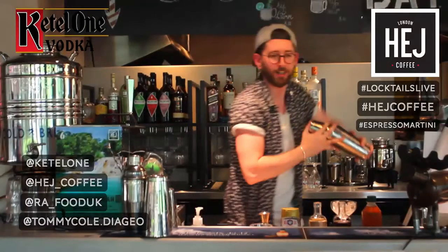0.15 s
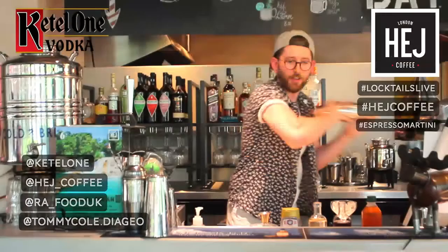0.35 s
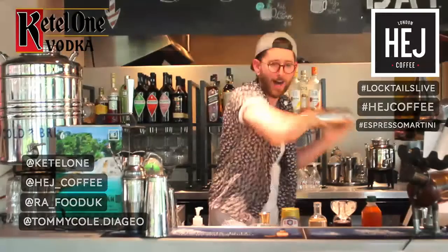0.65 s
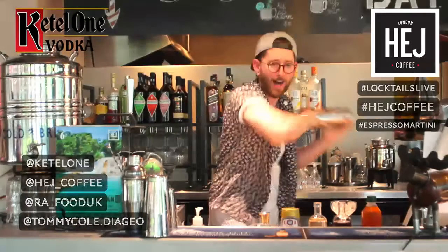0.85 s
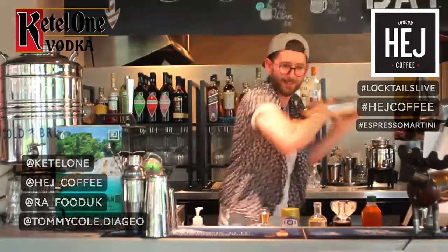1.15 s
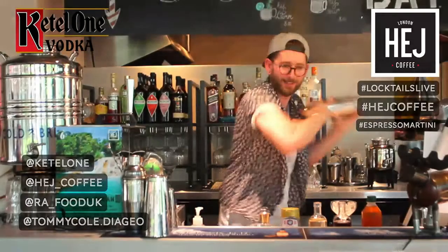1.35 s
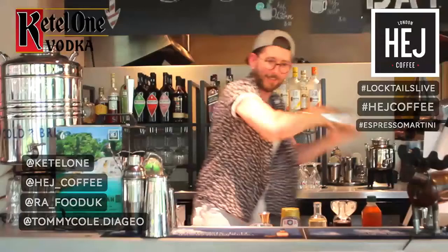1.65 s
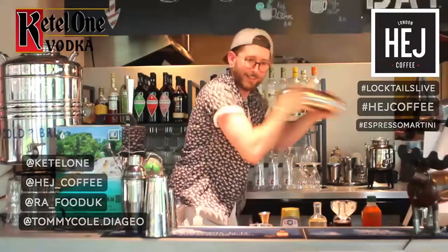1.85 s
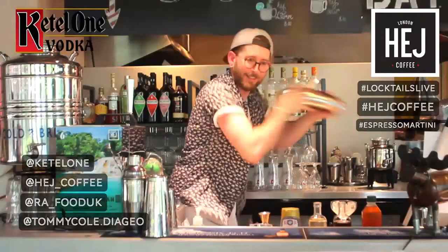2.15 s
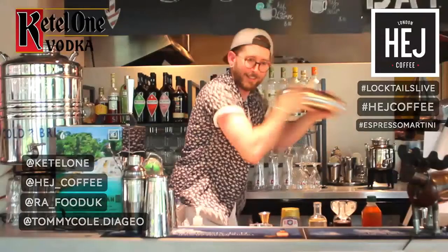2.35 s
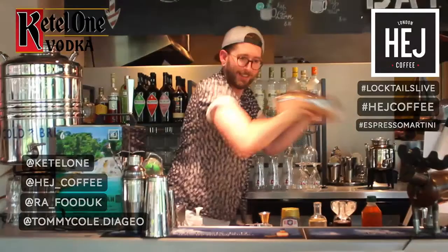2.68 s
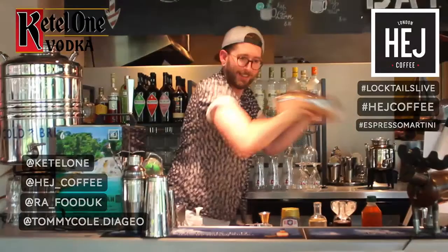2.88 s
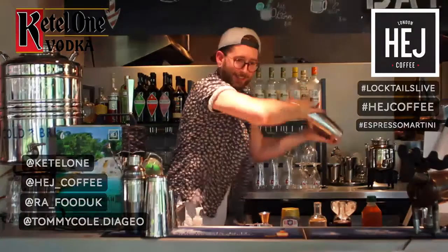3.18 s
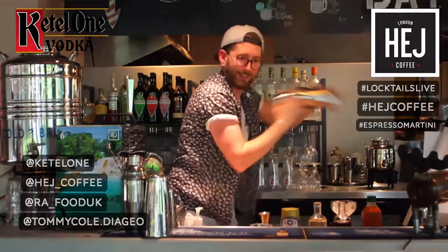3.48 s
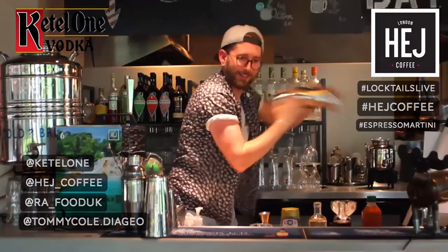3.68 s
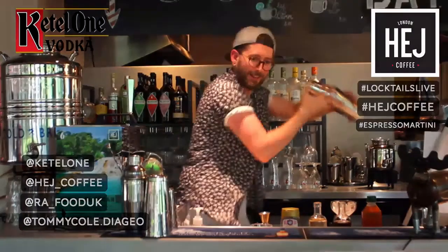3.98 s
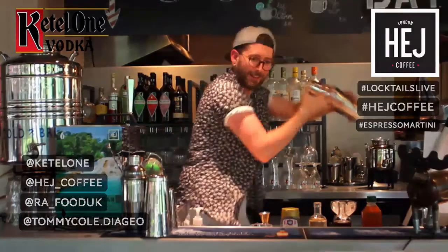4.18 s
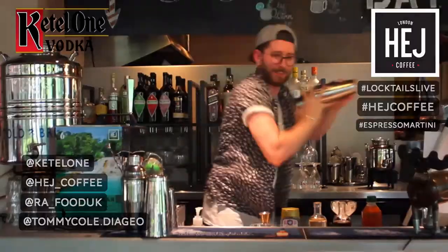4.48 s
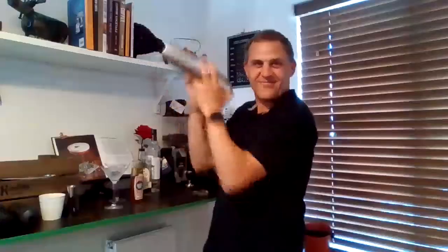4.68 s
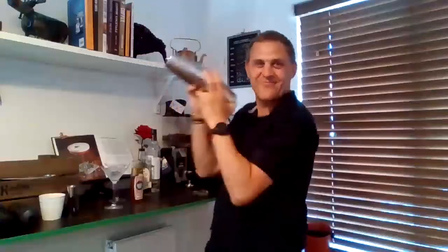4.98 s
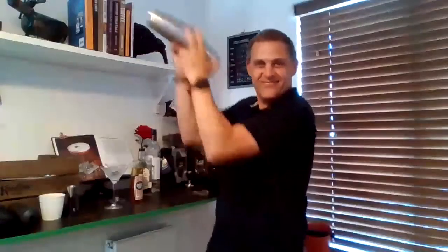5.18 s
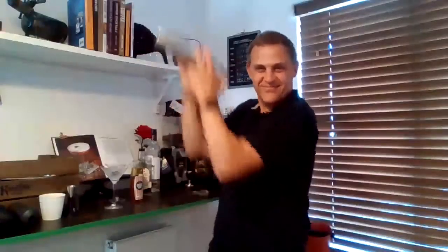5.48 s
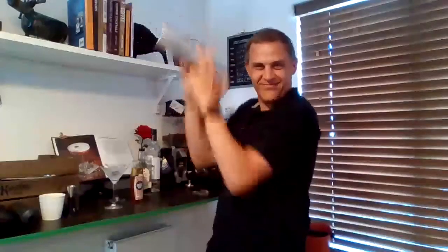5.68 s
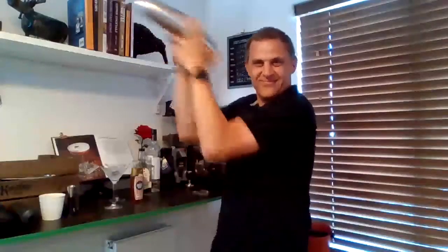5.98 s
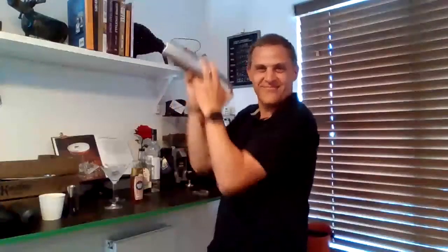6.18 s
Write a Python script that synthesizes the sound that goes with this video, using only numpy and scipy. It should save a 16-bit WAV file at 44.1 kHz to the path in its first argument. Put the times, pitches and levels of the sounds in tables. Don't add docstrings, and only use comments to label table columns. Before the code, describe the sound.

Brisk, continuous back-and-forth shaking of ice in a metal tin, sharp cracks and short rings in a small room, with brief digital dropouts.

```python
import sys
import numpy as np
from scipy import signal
from scipy.fft import rfft
from scipy.io import wavfile
from scipy.ndimage import uniform_filter1d

SR = 44100
rng = np.random.default_rng(int(sys.argv[2]) if len(sys.argv) > 2 else 0)


def voltage_ratio(decibels):
    exponent = np.asarray(decibels, float) / 20
    return 10 ** exponent


def log_audio(samples):
    frames = np.atleast_2d(samples).T
    limited = np.clip(frames, -1, 1)
    pcm = np.round(limited * 32767).astype(np.int16)
    wavfile.write(sys.argv[1], SR, pcm)


N = 279594
HOLD_S = 0.017
HELD_SPACING_HZ = 130


def rms_one(x):
    return x / np.sqrt(np.mean(x ** 2) + 1e-20)


def filtered(x, order, edges_hz, kind):
    return signal.sosfilt(signal.butter(order, edges_hz, kind, fs=SR, output="sos"), x)


def drift(rate_hz):
    r = np.exp(-128 * np.pi * rate_hz / SR)
    noise = rng.standard_normal(N // 64 + 1002)
    slow = signal.lfilter([1], [1, -2 * r, r * r], noise)[1000:]
    return np.interp(np.arange(N) / 64, np.arange(len(slow)), rms_one(slow))


def ring(clicks, hz, t60_s):
    r = voltage_ratio(-60 / (t60_s * SR))
    w = 2 * np.pi * hz / SR
    return signal.lfilter([0, np.sin(w)], [1, -2 * r * np.cos(w), r * r], clicks + 1e-18)


def impacts(per_s, spread_db):
    size = voltage_ratio(spread_db * np.minimum(rng.exponential(1, N), 3.5)) * rng.choice([-1, 1], N)
    return size * (rng.random(N) < per_s / SR)


def fridge():
    rumble = filtered(rng.standard_normal(N), 2, [60, 220], "band")
    hum = ring(rng.standard_normal(N), hz=76.4, t60_s=0.5)
    return voltage_ratio(-69.5) * rms_one(rumble) + voltage_ratio(-79.5) * rms_one(hum)


def room(x):
    t60_s, first_echo_s, patterns = 0.27, 0.004, 5
    out, t = 0, np.arange(SR // 2) / SR
    for _ in range(patterns):
        tail = rng.standard_normal(len(t)) * voltage_ratio(-60 * t / t60_s) * (t > first_echo_s)
        tail = signal.lfilter([0.6], [1, -0.4], tail)
        tail = tail / np.sqrt(patterns * np.sum(tail ** 2))
        out = out + signal.fftconvolve(x * drift(5.0), tail)[:N]
    return out


def effort():
    # start_s (peak), force_db, length_s, weight_db
    throws = [(0.061, -18.5, 0.18, 4.5), (0.315, -26, .15, 4.5), (0.557, -26.5, .115, -8.5),
              (0.77, -16.5, 0.098, 5), (1.04, -21, 0.11, 3.5), (1.217, -15.5, 0.13, 2.5),
              (1.454, -17, 0.1, -0.5), (1.694, -27, 0.17, -2.5), (1.905, -23.5, 0.14, 3.5),
              (2.163, -30, 0.1, -8), (2.36, -26.5, .19, 5.5), (2.583, -25, .24, 3.5),
              (2.831, -25.5, 0.11, 7), (3.065, -26.5, 0.15, 1), (3.274, -21, 0.17, 3),
              (3.511, -20, 0.11, -2.5), (3.73, -23.5, 0.18, -5.5), (3.979, -20, 0.15, 3),
              (4.227, -21.5, .18, -5), (4.446, -23.5, .26, 0.5), (4.698, -20, 0.2, 0),
              (4.945, -21.5, 0.13, 1.5), (5.185, -21.5, .145, -3), (5.409, -21.5, 0.12, -7),
              (5.66, -20.5, .11, 0), (5.89, -18, 0.17, -1.5), (6.12, -22.5, 0.17, 3)]
    # start_s (peak), force_db, length_s, weight_db
    pulls = [(0.188, -25, 0.17, 1.5), (0.43, -22, 0.22, 2), (0.655, -18.5, 0.1, -0.5),
             (0.865, -16, 0.19, -4.5), (1.114, -17, 0.091, -3), (1.359, -17.5, 0.09, -8.5),
             (1.572, -17, 0.11, -2.5), (1.799, -26.5, 0.055, -5.5), (2.029, -25, 0.2, -1),
             (2.285, -26, 0.31, 3), (2.468, -23.5, 0.15, 0.5), (2.715, -27.5, .28, 1.5),
             (2.938, -23, 0.22, 1), (3.168, -23, 0.063, 8), (3.415, -24, .11, -2), (3.619, -18, 0.11, 5),
             (3.86, -22, 0.14, 3), (4.095, -20.5, .195, 1.5), (4.34, -18.5, 0.085, 4.5),
             (4.569, -22.5, 0.17, 0.5), (4.83, -17.5, 0.11, -4), (5.049, -24.5, 0.13, -2.5),
             (5.291, -20, 0.099, -2), (5.526, -19.5, .11, 2), (5.758, -20.5, 0.062, -3),
             (5.99, -21, 0.14, -1), (6.227, -18.5, 0.24, -1.5)]
    # start_s (peak), force_db, length_s, weight_db
    rebounds = [
        (2.659, -26.5, .2, -6),
        (3.019, -34.5, 0.25, -8),
        (4.04, -24, 0.09, 4),
        (4.763, -35, 0.091, 6),
        (5.123, -22, 0.037, 3.5),
    ]
    t, power = np.arange(0, N + 64, 64) / SR, 1e-12
    for turns, rise_share in ((throws, 0.49), (pulls, 0.45), (rebounds, 0.31)):
        for s, force_db, length_s, weight_db in turns:
            away = np.where(t < s, (s - t) / rise_share, (t - s) / (1 - rise_share))
            shape_db = force_db - 10 * away / max(length_s, 0.03)
            crackle_db = -1.5 + 0.03 * weight_db + 0.0054 * (force_db + 28)
            power = power + voltage_ratio(shape_db + np.array([[weight_db], [0], [crackle_db]])) ** 2
    power = uniform_filter1d(power, size=5, axis=1)
    return np.array([np.interp(np.arange(N) / SR, t, 10 * np.log10(p)) for p in power])


def drive(rows_db, hz):
    place = np.interp(np.log(hz), np.log([700, 1200, 4200, 5600]), [0, 1, 1, 2])
    lower = min(int(place), 1)
    return voltage_ratio(rows_db[lower] + (place - lower) * (rows_db[lower + 1] - rows_db[lower]))


def clear_rings():
    # start_s, pitch_hz, level_db
    lone_tones = [(0.269, 4480, -36.5), (0.307, 1400, -32), (0.629, 1453, -34), (0.751, 227, -45.5),
                  (1.083, 2770, -37), (1.587, 897, -34.5), (1.894, 240, -48), (1.916, 2520, -33),
                  (2.15, 4330, -37), (2.276, 940, -38.5), (2.282, 240, -44), (2.81, 390, -46.5),
                  (2.82, 2740, -29), (3.147, 385, -46.5), (3.491, 2680, -31), (3.5, 390, -48),
                  (5.16, 3200, -31), (3.852, 2630, -43), (4.554, 4550, -33), (4.75, 1360, -30),
                  (4.805, 3220, -31), (4.963, 440, -48), (5.406, 4540, -34), (5.33, 2954, -30),
                  (5.647, 835, -40.5), (5.743, 2740, -24.5), (5.746, 6930, -30), (6.036, 1490, -33),
                  (6.107, 373, -43.5), (6.276, 4520, -36)]
    swell_s, t60_s, trim_db = 0.031, 0.097, 3.5
    out, t = np.zeros(N + SR), np.arange(SR // 4) / SR
    shape = (1 - np.exp(-t / swell_s)) * voltage_ratio(-60 * t / t60_s)
    shape = shape / shape.max()
    for s, hz, level_db in lone_tones:
        at = round(s * SR)
        out[at:at + len(t)] += voltage_ratio(level_db + trim_db) * shape * np.sin(2 * np.pi * hz * t)
    return out[:N]


def cracks(rows_db):
    snap = filtered(impacts(per_s=450.0, spread_db=3.5), 1, [1100, 5200], "band")
    return voltage_ratio(-9 + rows_db[1]) * rms_one(snap)


def ice(rows_db):
    # pitch_hz, density_db (dB per Hz)
    color = [(150, -40.5), (260, -41.5), (450, -23), (640, -21), (920, -9), (1450, -5), (2200, -5),
             (2800, 0), (4000, -6.5), (5700, -9.5), (7000, -7.5), (8500, -7.5)]
    color_hz, color_db = np.transpose(color)
    chips_db, slush_db, wander_db = -4.5, -6.5, 2.53
    chips, out = rms_one(impacts(per_s=5200.0, spread_db=3.5)), 0
    dealt = rng.integers(0, 3, N)
    slush = rng.standard_normal((2, N))
    for k, hz in enumerate(np.geomspace(150, 8500, num=25)):
        force = voltage_ratio(chips_db) * chips * (dealt == k % 3) * np.sqrt(3) + voltage_ratio(slush_db) * slush[k % 2]
        band = filtered(force, 2, [hz / 1.09, hz * 1.09], "band")
        level_db = np.interp(np.log(hz), np.log(color_hz), color_db) + 11
        out = out + voltage_ratio(level_db + wander_db * drift(10.3)) * drive(rows_db, hz) * band
    return out


def tin(rows_db):
    # pitch_hz, level_db, t60_s
    wall_modes = [(240, -32.5, 0.074), (390, -18, 0.064), (455, -15.5, 0.071), (616, -21.5, .06),
                  (940, -8, 0.03), (1040, -29, 0.013), (1400, -3.5, 0.13), (1437, -7, 0.13),
                  (1544, -2, 0.068), (1803, -2, 0.048), (2120, -8, 0.069), (2275, -12, 0.13),
                  (2275, -12.5, 0.066), (2556, 0, 0.079), (2700, 1.5, 0.18), (2794, 3, 0.059),
                  (2900, -6, 0.029), (2934, -2, 0.16), (3229, -3.5, 0.029), (3200, -7.5, 0.034),
                  (3096, -5.5, 0.12), (3346, -6.5, 0.02), (3807, -9, 0.069), (4324, -1, 0.14),
                  (4540, -2, 0.04), (4815, 0.5, 0.0086), (6300, -3.5, .05), (6860, -23.5, .06)]
    # start_s, body_db, cap_db
    grip = [(0.0, -3, -18.5), (0.35, 6, 6.5), (0.8, 0, -10.5), (1.14, -1, -0.5), (1.35, 1, 0.5),
            (1.7, 5, 4), (2.4, 0, 0), (2.9, 6, -0.5), (3.1, 8.5, 9), (3.4, 2, -10), (3.7, 1.5, 1),
            (4.2, -3, 0.5), (4.5, 3, 1.5), (5.08, 3.5, -3), (5.17, 5, 3.5), (5.42, 4, 1.5), (5.6, 3, 3),
            (6.33, 3, 3.5)]
    s, body_db, cap_db = np.transpose(grip)
    t = np.arange(N) / SR
    body, cap = voltage_ratio(np.interp(t, s, body_db)), voltage_ratio(np.interp(t, s, cap_db))
    knocks, out = impacts(per_s=260.0, spread_db=5.0), 0
    for hz, level_db, t60_s in wall_modes:
        spot = voltage_ratio(5.0 * rng.standard_normal(N)) * rng.choice([-1, 1], N)
        free = body if hz < 1900 else cap if hz < 3600 else 1
        mode = rms_one(ring(knocks * spot, hz, t60_s)) / 4
        out = out + voltage_ratio(level_db) * free * drive(rows_db, hz) * mode
    return out


def scene():
    rows_db = effort()
    shaker = voltage_ratio(-6) * tin(rows_db) + ice(rows_db) + cracks(rows_db) + clear_rings()
    shaker = filtered(shaker, 2, 306, "high")
    return (shaker + voltage_ratio(-17.5) * room(shaker) + fridge())[None]


def strongest(x, count):
    window = np.hanning(len(x))
    height = 2 * abs(rfft(x * window, SR // 10)) / window.sum()
    peaks = signal.find_peaks(height, distance=HELD_SPACING_HZ / 10)[0]
    favored = height[peaks] * peaks ** 0.6
    peaks = peaks[np.argsort(favored)[-count:]]
    return np.array([10.0 * peaks, height[peaks]])


def held_tones(x, at, mid, length_s, top_hz, top_db):
    # start_s (middle of the packet), pitch_hz, level_db
    held_modes = [(.126, 1366, -28), (2.532, 1180, -45), (.174, 2700, -28.5), (.427, 2740, -23),
                  (.477, 1460, -30.5), (.477, 1850, -32), (1.222, 964, -26.5), (1.222, 1455, -24),
                  (1.565, 950, -31.5), (1.565, 1600, -23), (1.565, 1740, -21), (1.565, 2340, -25),
                  (1.565, 2660, -21), (1.894, 920, -31), (1.894, 1500, -30.5), (1.894, 2100, -28.5),
                  (2.532, 1554, -37), (2.532, 2120, -35), (2.705, 1590, -27), (3.474, 1630, -40),
                  (3.474, 2130, -38), (4.216, 2790, -27), (4.285, 1840, -32), (4.285, 2550, -28),
                  (5.224, 1437, -33.5), (5.224, 1500, -32), (5.371, 2740, -30), (5.700, 1490, -32),
                  (5.796, 1400, -34), (5.796, 2900, -28),
                  (.427, 6300, -36), (.427, 6680, -31), (1.222, 3690, -22), (1.222, 3910, -27),
                (.174, 6860, -31.5), (1.334, 4070, -32), (1.565, 3156, -23), (1.894, 3140, -36),
                (4.216, 5170, -29), (2.532, 3200, -31.5), (2.532, 3780, -37), (2.532, 4490, -37),
                (2.532, 6360, -37), (4.497, 4580, -38), (3.474, 4300, -40), (3.474, 6100, -46),
                (4.216, 3140, -25), (4.216, 4070, -27), (4.285, 4750, -33), (5.224, 3155, -28),
                (5.224, 3220, -26), (5.224, 4460, -36), (5.224, 4720, -33), (5.224, 7200, -38.5),
                (5.371, 3610, -26), (4.497, 5240, -37), (5.700, 4460, -35), (5.700, 5090, -34),
                (2.532, 4790, -37), (5.796, 5030, -35)]
    heard = round(0.022 * SR)
    before, after = strongest(x[at[0]:][:heard], count=5), strongest(x[:at[-1]][-heard:], count=5)
    hz, height = np.hstack([before, after])
    nearby = [m[1:] for m in held_modes if abs(m[0] - mid) < HOLD_S]
    clear_hz, clear_db = np.transpose([(top_hz, top_db)] + nearby)
    apart = abs(hz[:, None] - clear_hz).min(axis=1) > HELD_SPACING_HZ
    height = np.minimum(voltage_ratio(-0.5 - 450 * length_s) * height, voltage_ratio(top_db)) * apart
    hz, height = np.append(hz, clear_hz), np.append(height, voltage_ratio(clear_db))
    phase, side = rng.random((2, len(hz), 1))
    side[:5], side[5:10] = 0, 1
    lean = voltage_ratio(450 * (2 * side - 1) * (at / SR - mid))
    return height @ (lean * np.cos(2 * np.pi * (hz[:, None] * at / SR + phase)))


def conceal(x):
    # middle_s, silent_length_s, pitch_hz, level_db
    lost = [(0.127, 0, 2740, -25), (0.176, 0.00065, 4340, -22), (0.429, 0.0016, 1740, -28),
            (0.475, 0.0013, 2710, -25), (1.22, 0.0029, 2960, -18.5), (1.33, .002, 2850, -32),
            (1.564, 0.0025, 2900, -19), (1.896, 0.0039, 2680, -30), (2.532, .023, 2710, -34),
            (2.706, 0, 2800, -33), (3.475, .009, 2860, -40.5), (4.217, 0, 1520, -27.5),
            (4.284, 0.000026, 3010, -30), (4.496, 0.0026, 2870, -32), (5.144, 0, 6060, -26.5),
            (5.223, .023, 2750, -28), (5.37, 0, 2940, -27), (5.701, 0, 3000, -29), (5.796, 0, 2690, -23.5),
            (5.953, 0.0019, 1376, -25.5)]
    fade_s, splice_s, splice_half_s = 0.012, 4.387, 0.003
    out = x.copy()
    for mid, length_s, top_hz, top_db in lost:
        reach = length_s / 2 + HOLD_S
        at = np.arange(round((mid - reach) * SR), round((mid + reach) * SR))
        tones = held_tones(x, at, mid, length_s, top_hz, top_db)
        away = abs(at / SR - mid) - length_s / 2
        left = voltage_ratio(-21 - 950 * length_s)
        live = left + (1 - left) * np.sin(np.clip(away / fade_s, 0, 1) * np.pi / 2) ** 2
        out[at] = out[at] * live + tones * np.cos(np.clip(away / HOLD_S, 0, 1) * np.pi / 2)
    return out * np.clip(abs(np.arange(N) / SR - splice_s) / splice_half_s, 0, 1) ** 2


def roll_off(x):
    return signal.sosfilt(signal.butter(12, 8510, fs=SR, output="sos"), x)


def record(dry):
    rounded = 0.8 * np.tanh(dry[0] / 0.8)
    link = filtered(conceal(rounded), 26, 7140, "low")
    return roll_off(link[None])


dry = scene()
out = record(dry)
log_audio(out)
```